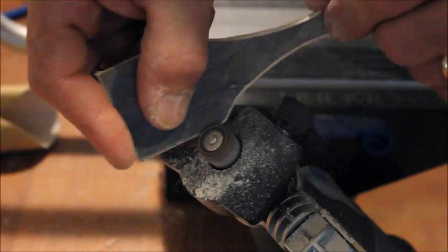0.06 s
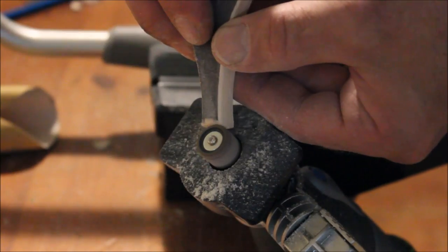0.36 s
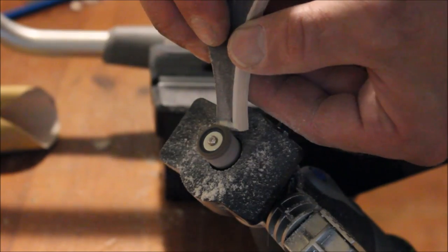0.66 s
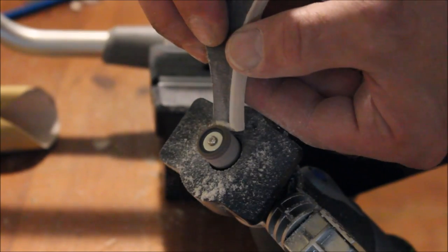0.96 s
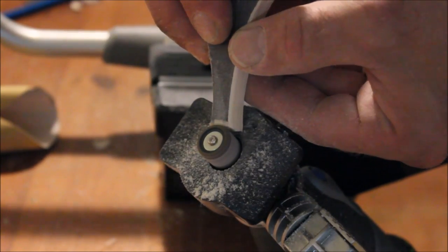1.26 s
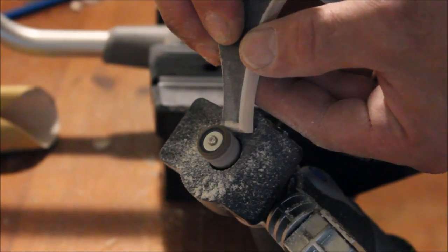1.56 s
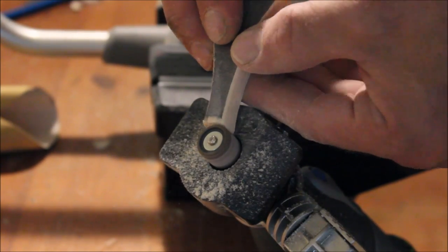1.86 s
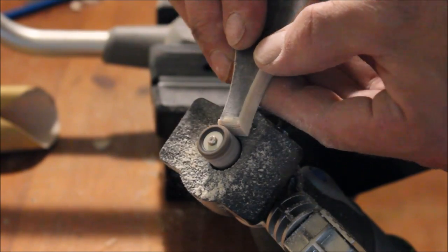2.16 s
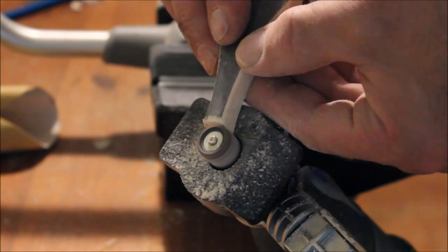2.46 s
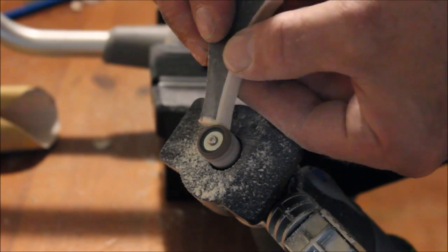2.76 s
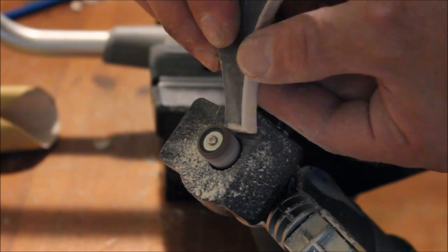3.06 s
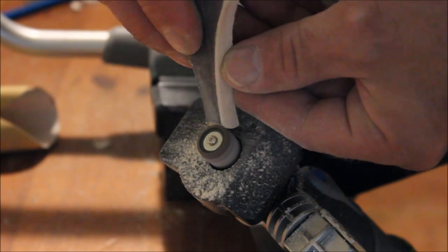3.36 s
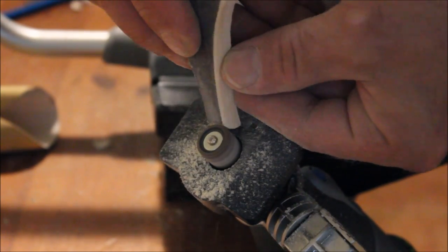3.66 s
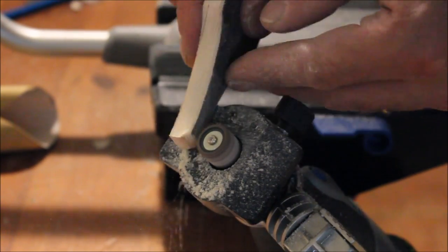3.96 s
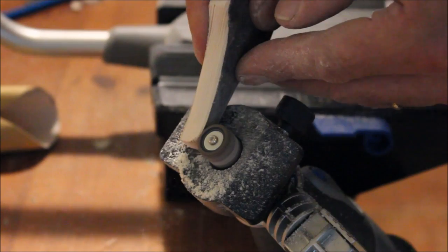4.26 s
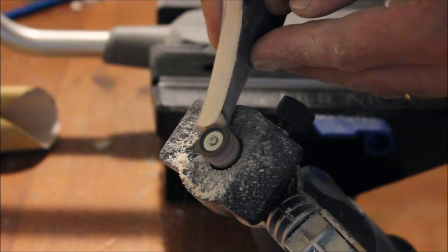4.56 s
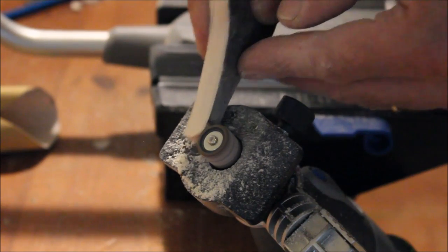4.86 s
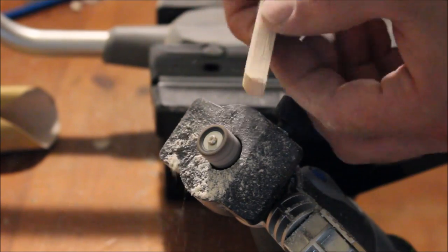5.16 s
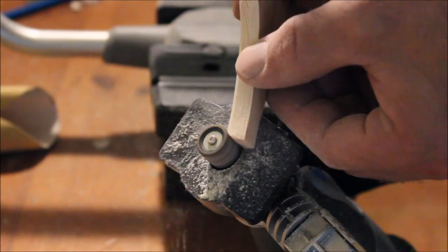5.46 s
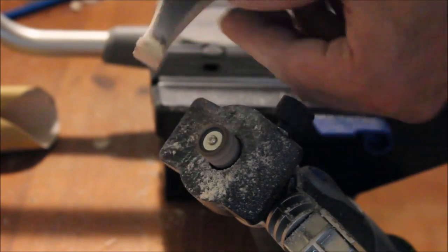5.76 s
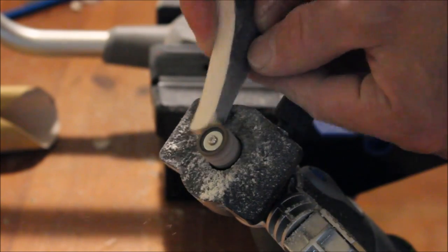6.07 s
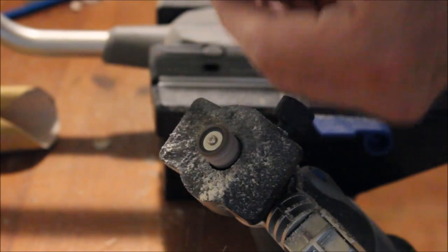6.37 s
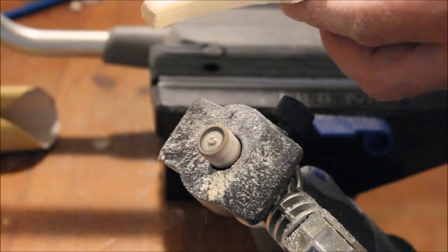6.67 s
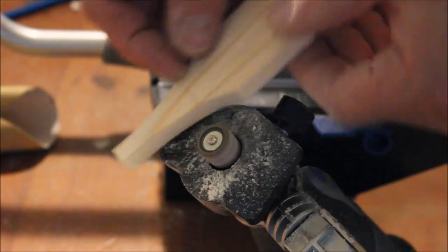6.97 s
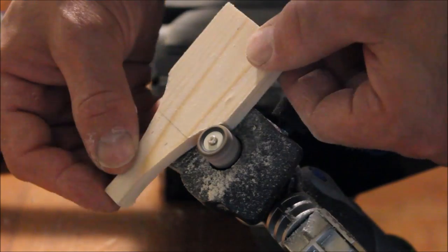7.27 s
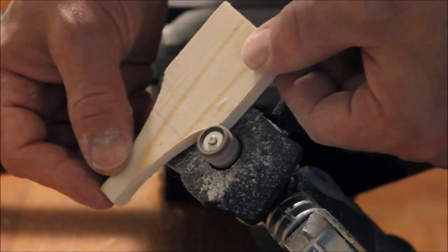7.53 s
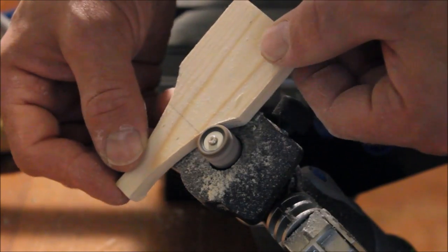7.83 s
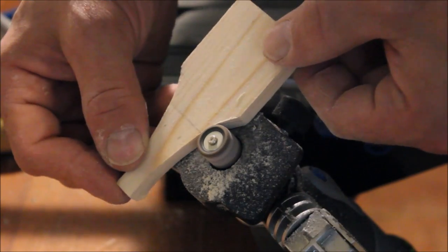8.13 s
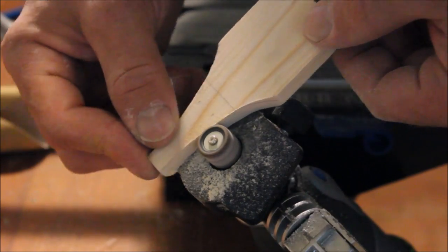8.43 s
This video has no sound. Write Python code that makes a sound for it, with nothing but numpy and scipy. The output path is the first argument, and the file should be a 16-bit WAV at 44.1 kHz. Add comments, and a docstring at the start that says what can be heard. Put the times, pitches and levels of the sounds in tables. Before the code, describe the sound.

Wood grinds against a small spinning sanding drum with a gritty buzz, broken by gaps where the motor whines back up.

```python
"""Workbench, close up: a small rotary tool whines as wood meets its sanding drum in five passes and a graze.
Each hand stroke drags the speed to about half; between passes the motor runs up again. The grit repeats
every turn and buzzes through the resonances of wood and tool; torn fibres hiss; the wood chatters and
bites. Shaft harmonics and fan air make the whine, over a faint workshop rumble and hum.
At moments the noise drops out and a few clean tones remain."""
import sys
import numpy as np
from scipy import signal
from scipy.fft import rfft, irfft, next_fast_len
from scipy.io import wavfile
from scipy.ndimage import uniform_filter1d, map_coordinates

SR = 44100
rng = np.random.default_rng(int(sys.argv[2]) if len(sys.argv) > 2 else 0)


def digitize_waveform(pressure):
    """Quantize a signal to 16-bit integers and store it at the path in sys.argv[1].

    Rows of a 2-D input are taken as channels; values are limited to [-1, 1].
    """
    field = np.atleast_2d(pressure).T
    bounded = np.clip(field, -1, 1)
    quanta = np.round(bounded * 32767).astype(np.int16)
    wavfile.write(sys.argv[1], SR, quanta)


N = 374839
TIME_S = np.arange(N) / SR
FREQ_HZ = np.maximum(np.arange(N // 2 + 1) * SR / N, 1)
IDLE_HZ = 573.6

# Levels are relative. Drag: share of idle speed lost.
# Buzz, rasp and hiss bands: low/Hz, high/Hz
BANDS = [(20, 3000), (3000, 7500), (7500, 20000)]
# Wood on drum: start/s, end/s, buzz/dB, rasp/dB, hiss/dB, sizzle above 12 kHz/dB, whine return delay/s
PASSES = [(-.1, 3.752, -50, -56.5, -52, -3.5, 0.0078), (4.065, 5.04, -60, -52.5, -54, 2, 0.022),
          (5.401, 5.752, -52, -55, -57.5, 2, 0.0011), (5.945, 6.18, -64, -50.5, -56.5, 5, 0.022),
          (7.137, 7.16, -60.5, -50, -59, -6, 0), (7.215, 8.6, -61, -48.5, -53.5, -5, 0.0031)]
# Hand presses harder: start/s, length/s, first drag, last drag, buzz/dB, rasp/dB, hiss/dB
STROKES = [(-0.001, 0.14, 0.48, 0.38, -3, 4.5, 3), (0.181, 0.59, 0.52, 0.18, -0.5, 5, -0.5),
           (0.487, 0.44, 0.47, 0.56, -1.5, 0.5, -1), (0.858, 0.15, 0.2, 0.66, -2.5, 4.5, 0),
           (1.039, 0.32, 0.44, 0.23, -0.5, 4.5, -0.5), (1.203, 0.33, 0.45, 0.59, -0.5, 1.5, -2.5),
           (1.557, 0.42, 0.54, 0.41, -0.5, 3.5, -3), (2.042, 0.19, 0.6, 0.38, -1, 5, -4),
           (2.081, 0.35, 0.15, 0.47, 0.5, 4.5, -1), (2.497, 0.22, 0.57, 0.36, 1, 6.5, -0.5),
           (2.739, 0.24, 0.6, 0.36, 1, 5.5, 1), (2.917, 0.11, 0.29, 0.59, -3, 0.5, -1.5),
           (3.074, 0.26, 0.45, 0.17, 3, 3.5, 0.5), (3.253, 0.28, 0.55, 0.49, 0.0, 1, -2.5),
           (3.562, 0.15, 0.24, 0.53, 1, 4, -0.5), (4.148, 0.1, 0.7, 0.68, 5, -1.5, -4.5),
           (4.291, 0.22, 0.49, 0.46, 3, -1, -3.5), (4.533, 0.2, 0.29, 0.54, -4.5, -6.5, -5),
           (4.864, 0.21, 0.58, 0.31, -2.5, -5.5, -2.5), (5.448, 0.22, 0.52, 0.51, 1.5, 5, 5.5),
           (5.986, 0.17, 0.63, 0.41, 6, -1, 3.5), (7.222, 0.077, 0.63, 0.81, 10, -0.5, -0.5),
           (7.333, 0.2, 0.54, 0.33, 8, -1.5, -4), (7.582, 0.22, 0.61, 0.48, 7.5, 0.5, -4),
           (7.837, 0.11, 0.51, 0.6, 7.5, -3, -6), (7.982, 0.21, 0.34, 0.54, 8, -3, -5.5),
           (8.235, 0.34, 0.54, 0.5, 4, -2.5, -4)]
# Grit catches (+) or wood slips (-): t/s, half length/s, added drag, buzz/dB, rasp/dB, hiss/dB
CATCHES = [(0.021, 0.062, -0.019, 5, 3, -4), (0.176, 0.03, 0.04, 4, 0, -2),
           (0.345, 0.036, -0.043, -3.5, 0, 3), (0.402, 0.028, -0.044, 1.5, -1.5, 1.5),
           (0.639, 0.036, -0.041, 0.5, -2.5, 0.5), (0.929, 0.026, -0.027, 3, -5, 2.5),
           (0.575, 0.02201, 0.034, -2, -4.5, -5), (0.977, 0.025, 0.049, -3, -7, -0.5),
           (1.223, 0.019, -0.072, 4.5, 3, 2.5), (1.754, 0.033, 0.0057, 0.5, 3, 2.5),
           (1.937, 0.014, -0.13, 1, 1, -4), (1.992, 0.02, 0.029, -1.5, 0.5, 0),
           (2.196, 0.052, -0.054, 1.5, -2.5, 2.5), (2.279, 0.033, -0.16, -1.5, -2.5, 2),
           (2.466, 0.018, 0.074, -4, 3, 0), (2.922, 0.025, 0.23, -1, -1.5, 0.5),
           (2.968, 0.018, -0.18, -1.5, 0, 1.5), (3.098, 0.047, 0.0068, -4, 4, 1),
           (3.499, 0.045, -0.015, -1, 4.5, 3.5), (4.102, 0.06, -0.056, -1, 4.5, -3),
           (4.257, 0.065, 0.018, -6.5, -2.5, -3), (4.389, 0.019, 0, 3, -1, -1.5),
           (4.538, 0.044, -0.053, -4.5, 1, 0.5), (4.565, 0.018, -0.038, 2, 0.5, -6),
           (4.604, 0.014, 0.025, 6, 7.5, 3), (4.714, 0.04, -0.03, 9, 5.5, 1),
           (4.802, 0.034, 0.085, -4.5, -4.5, -5), (4.896, 0.021, 0.0047, -17.5, -0.5, -8.5),
           (4.976, 0.03, 0.011, 3, 9.5, 0), (5.699, 0.049, 0.047, -2.5, -0.5, 5.5),
           (5.99, 0.018, -0.03, -9, -3, -4), (6.113, 0.012, -0.018, -4.5, -8.5, -5),
           (7.236, 0.024, -0.004, -10, 1.5, 1), (7.403, 0.018, 0.0092, -2.5, -2, 0.5),
           (7.528, 0.022, -0.015, 2, 0.5, 2), (7.696, 0.018, -0.13, 1, -0.5, -2),
           (7.605, 0.019, -0.08, 3.5, 3.5, 3.5), (7.755, 0.02, 0.01, -2, -6, -3),
           (7.786, 0.018, -0.12, 0.5, -1.5, 2), (7.845, 0.036, -0.0015, 4, 5.5, 4),
           (7.958, 0.016, -0.022, 0.5, 1, 0), (8.052, 0.014, 0.16, 3, 1.5, 2)]
# Grit digs in: t/s, half length/s, tearing over buzz/dB
TEARS = [(.16, .025, 9), (.52, .025, 12), (.91, .03, 8), (1.78, .035, 10), (2.05, .02, 10), (2.63, .02, 9),
         (2.93, .05, 11), (4.19, .04, 10), (4.87, .015, 10), (4.99, .03, 9), (5.66, .05, 11),
         (6.07, .1, 10), (7.28, .05, 5), (8, .17, 4)]
# Chatter rings one wood resonance: t/s, half length/s, f/Hz, level/dB
CHATTER = [(0.035, .06, 1650, 11), (0.203, 0.066, 2300, 15), (0.443, 0.043, 2520, 19),
           (0.657, 0.087, 1250, 12), (0.818, 0.12, 3100, 9), (.85, 0.045, 4100, 15),
           (0.978, 0.11, 1210, 13.5), (1.175, 0.078, 2806, 7), (1.37, 0.098, 3136, 13),
           (1.434, 0.078, 1283, 17), (1.911, 0.1, 902, 16), (2.1, 0.069, 4040, 5.5),
           (2.141, 0.1, 852.5, 14.5), (2.626, 0.058, 863.6, 5), (3.22, 0.062, 2378, 18.5),
           (3.679, 0.069, 2274, 7.5), (4.201, 0.17, 5630, 9.5), (4.4, 0.051, 6440, 20),
           (4.47, 0.086, 3710, 12), (5.569, 0.062, 4868, 23), (5.613, 0.029, 2086, 8),
           (5.649, 0.058, 4565, 13.5), (7.368, 0.04, 3950, 4.5), (7.471, 0.038, 1750, 18),
           (7.635, 0.066, 4173, 10), (7.838, 0.025, 3520, 14), (8.401, 0.097, 1645, 13),
           (8.419, .11, 4220, 12)]
# All noise drops out briefly, a few clean tones remain: t/s, half length/s, noise drop/dB
CLEAN_TONE_GAPS = [(.392, .018, 30), (.575, .027, 32), (4.065, .016, 10), (4.381, .018, 32),
                   (4.895, .02, 17), (7.155, .022, 22), (7.55, .012, 7), (7.635, .01, 7), (7.84, .018, 7),
                   (8.22, .018, 24)]
# Clean tone targets, each rounded to a shaft order: f/Hz
CLEAN_TONE_HZ = [1200, 1750, 2000, 2350, 3400, 3750, 5700, 6450, 8500, 11200]
# Broad sanding spectrum: f/Hz, level/dB
SANDING_SPECTRUM = [(120, -77), (200, -57.5), (293, -48.5), (715, -23.5), (923, -20), (1210, -21),
                    (1330, -10.5), (2420, -0.5), (2960, -8), (4030, -5), (5700, -12), (10800, -10.5),
                    (15500, -12.5)]
# Resonances and hollows of wood and tool: f/Hz, width/Hz, lift/dB
BODY_RESONANCES = [(291, 26, 12.5), (444, 32, 7), (524, 37, -26.5), (699, 76, -14), (942, 37, 8),
                   (1210.5, 180, 18), (1308, 36, -8), (1526, 70, 3.5), (1755, 51, 8.5), (1837, 96, -5.5),
                   (2020, 360, 4.5), (2396, 70, 7), (2680, 29, -3), (3095, 110, -5), (3164, 130, 6),
                   (3315, 91, -9), (3494, 110, 7.5), (3904, 200, -0.5), (4120, 63, 13), (5330, 120, 5.5),
                   (6430, 1300, 3.5), (7480, 210, 3.5), (10640, 640, 5), (11980, 1300, -6)]
# Duller, broad piece of wood: f/Hz, width/Hz, lift/dB
BROAD_PIECE = [(3720, 760, 2.5), (5760, 840, -3)]
# Whine at idle: shaft order, level/dB
WHINE_ORDERS = [(1, -2.5), (2, -12), (2.5, -12), (3, -8), (4, -10), (5, -10), (5.5, -11), (6, -6), (7, -12),
                (8, -10), (9, 0), (10, -9), (11, -6), (12, -8), (13, -10), (16, -12), (17, -7), (18, -10),
                (19, -16)]
# Strongest overtone swells to a whistle: shaft order, t/s, half length/s, lift/dB
WHISTLE = (9, 7.06, .1, 4)
# Fan air and brush noise: f/Hz, level/dB
AIR_SPECTRUM = [(120, -78), (200, -39), (506, -24), (564, -20), (690, -21), (1170, -17), (1540, -11.5),
                (1680, -16.5), (1880, -9), (2330, -9.5), (5300, -6.5), (8500, -14.5), (10400, -5.5),
                (12200, -18), (15500, -16.5)]
# Workshop rumble: f/Hz, level/dB
ROOM_SPECTRUM = [(20, 17.5), (35, -13), (60, -1.5), (120, -22), (190, -2.5), (260, -17), (400, -10.5),
                 (1000, -33)]
# Wood bites and sounds a tone: t/s, half length/s, shaft order, level/dB
BITES = [(4.127, .017, 7, -47), (4.95, .05, 13, -53), (5.965, .022, 7, -54), (7.148, .021, 7, -53),
         (7.229, .02, 7, -50), (7.294, .017, 12, -47), (8.44, .09, 15, -52)]


def undb(db):
    """dB to gain."""
    return 10 ** (np.asarray(db) / 20)


def unit(x):
    """Scale to rms 1."""
    return x / np.sqrt(np.mean(x ** 2))


def steady(x, window_s):
    """Hold short-term rms at 1."""
    return x / np.sqrt(uniform_filter1d(x ** 2, int(window_s * SR)) + 1e-12)


def walk(rate_hz):
    """Smooth random drift, rms 1."""
    steps = np.repeat(rng.standard_normal(N // 64 + 1), 64)[:N]
    size = max(int(SR / rate_hz), 1)
    return unit(uniform_filter1d(uniform_filter1d(steps, size), size))


def span(t_s, half_s):
    """Flat-topped swell centred on t_s."""
    return np.interp(TIME_S, t_s + half_s * np.array([-1.3, -.6, .6, 1.3]), [0, 1, 1, 0])


def hold(start_s, end_s, attack_s=.012, release_s=.012):
    """1 from start to end, ramps outside."""
    return np.clip(np.minimum((TIME_S - start_s) / attack_s, (end_s - TIME_S) / release_s) + 1, 0, 1)


def spectrum_db(points):
    """Interpolate a spectrum over log frequency."""
    hz, db = np.transpose(points)
    return np.interp(np.log(FREQ_HZ), np.log(hz), db)


def resonance_db(hz, resonances=BODY_RESONANCES):
    """Summed resonance lift at hz."""
    return sum(db / (1 + (2 * (hz - centre) / width) ** 2) for centre, width, db in resonances)


def colour(x, gain):
    """Filter by a gain given on FREQ_HZ."""
    size = next_fast_len(N, True)
    bins_hz = np.arange(size // 2 + 1) * SR / size
    return irfft(rfft(x, size) * np.interp(bins_hz, FREQ_HZ, gain), size)[:N]


def shelf(x, corner_hz, lift_db):
    """Time-varying treble lift."""
    return x + colour(x, 1 / (1 + (corner_hz / FREQ_HZ) ** 20)) * (undb(lift_db) - 1)


def hand(rest_drag=.17):
    """Strokes, catches and passes set drag, band levels and sizzle."""
    drag, bands_db, sizzle_db = np.full(N, rest_drag), np.zeros((3, N)), np.zeros(N)
    for start_s, length_s, first, last, *db in STROKES:
        press = hold(start_s, start_s + length_s, attack_s=.03, release_s=.04)
        drag += press * (np.interp(TIME_S, [start_s, start_s + length_s], [first, last]) - rest_drag)
        bands_db += np.outer(db, press)
    for t_s, half_s, jerk, *db in CATCHES:
        swell = span(t_s, half_s)
        drag += jerk * swell
        bands_db += np.outer(db, swell)
    for start_s, end_s, *db, pass_sizzle_db, _ in PASSES:
        on = hold(start_s, end_s) > 0
        bands_db[:, on] += np.array(db)[:, None]
        sizzle_db[on] = pass_sizzle_db
    return drag, bands_db, sizzle_db


def spindle(drag, contact, tearing_db, inertia_s=.084, initial_drag=.56):
    """Shaft speed/Hz: lags the drag by rotor inertia, trembles under load, wobbles with the hand."""
    pole = np.exp(-1 / (inertia_s * SR))
    load = contact * np.clip(drag, 0, .9)
    lagged, _ = signal.lfilter([1 - pole], [1, -pole], load, zi=[initial_drag * pole])
    tremble = (.0003 + .005 * contact * undb(tearing_db / 2)) * walk(130)
    wobble = .006 * contact * walk(25)
    return IDLE_HZ * (1 - lagged) * (1 + tremble + wobble)


def grit(turns, speed_hz, noise_drop_db, renew_hz=104.78, worn_share=.034, patchy_db=3.5, orders=52):
    """Grit force: a rough profile read once a turn, changing as the contact wanders along the drum."""
    worn = np.exp(2j * np.pi * rng.random(orders))
    drift = rng.standard_normal((1536, orders, 3))
    for k in range(orders):  # coarse bumps outlast fine ones
        drift[:, k] = unit(uniform_filter1d(drift[:, k], 4 + 40 // (k + 6), axis=0))
    fresh = (drift[..., 0] + 1j * drift[..., 1]) * undb(patchy_db * drift[..., 2])
    harmonics = np.sqrt(worn_share) * worn + np.sqrt(1 - worn_share) * fresh / np.std(fresh)
    profiles = irfft(np.pad(harmonics, ((0, 0), (1, 0))), 512)
    position = [TIME_S * renew_hz, turns % 1 * 512]
    rough = unit(map_coordinates(profiles, position, order=1, mode="grid-wrap"))
    rough_gain = undb(-noise_drop_db)
    tones = sum(clean_tones(t_s, half_s, np.interp(t_s, TIME_S, speed_hz))
                for t_s, half_s, _ in CLEAN_TONE_GAPS)
    force = rough_gain * rough + np.sqrt(np.maximum(1 - rough_gain ** 2, 0)) * tones
    return force + chatter(force) / np.sqrt(orders)


def sanding(turns, speed_hz, band_gains, tearing_db, noise_drop_db, sizzle_db,
            fibres_db=(-17, -11.5, -3), grab_db=(2.5, 3, 4), broad_from_s=7):
    """Grit buzz and tearing fibres ring wood and tool; higher bands hold more tearing."""
    body = undb(spectrum_db(SANDING_SPECTRUM) + resonance_db(FREQ_HZ))
    radiation = .4 + .6 / (1 + (720 / FREQ_HZ) ** 12)  # small pieces radiate little bass
    buzz = colour(grit(turns, speed_hz, noise_drop_db), radiation)
    throb_db = 2.5 * np.cos(2 * np.pi * turns)  # drum runs out of true
    snap_db = 2 * walk(900)  # fibres snap unevenly
    fibres = rng.standard_normal(N) * undb(throb_db + snap_db)
    broad = undb(resonance_db(FREQ_HZ, BROAD_PIECE))
    buzz, fibres = (np.where(TIME_S < broad_from_s, x, colour(x, broad)) for x in (buzz, fibres))
    grabs = walk(63) - 3 * np.maximum(walk(45) - 1, 0)  # fibres briefly let go
    rumble = unit(colour(fibres, body / (1 + (FREQ_HZ / 400) ** 12)))
    out = undb(-45) * band_gains[0] * rumble
    for band, (low_hz, high_hz) in enumerate(BANDS):
        passband = body * (FREQ_HZ >= low_hz) * (FREQ_HZ < high_hz)
        tear_gain = undb(fibres_db[band] + tearing_db - noise_drop_db + grab_db[band] * grabs)
        mix = steady(colour(buzz, passband), .023) + tear_gain * unit(colour(fibres, passband))
        judder = undb(1.29 * walk(200) + .86 * walk(76))
        out += mix / np.sqrt(1 + tear_gain ** 2) * band_gains[band] * judder
    return shelf(out, 12000, sizzle_db + 2 * walk(25))  # finest scraping comes in spurts


def bench(x, echo_db=-6, decay_s=.03):
    """Short reflections from vice, hands and bench ripple the treble."""
    t_s = np.arange(1024) / SR
    echoes = rng.standard_normal(len(t_s)) * np.exp(-t_s / decay_s) * (t_s > .001)
    wet = signal.fftconvolve(x, echoes / np.linalg.norm(echoes))[:N]
    return x + undb(echo_db) * colour(wet, 1 / (1 + (2500 / FREQ_HZ) ** 2))


def motor(turns, speed_hz, air_gain, whine_gain, half_order_db=-21):
    """Shaft harmonics, shaken by the bearing, over fan air that pulses with the shaft."""
    cages = [np.cos(2 * np.pi * (.103 * turns + k / 3)) for k in range(3)]
    flutters = [undb(2 * walk(48) + 3 * cage) for cage in cages]
    whistle_order, whistle_s, half_s, whistle_db = WHISTLE
    octaves = np.log2(speed_hz / IDLE_HZ)
    orders = {k + .5: half_order_db for k in range(2, 19)} | dict(WHINE_ORDERS)
    whine = 0
    for k, (order, db) in enumerate(sorted(orders.items())):
        shake = flutters[k % 3] if order > 1 else 1  # unbalance tone is steady
        if order == whistle_order:
            shake = shake * undb(whistle_db * span(whistle_s, half_s) + 35 * octaves)
        whine = whine + shake * undb(db - resonance_db(order * IDLE_HZ)) * shaft_tone(turns, order)
    # orders flare as they sweep the resonances; the small housing radiates little bass
    housing = undb(resonance_db(FREQ_HZ)) / np.sqrt(1 + (480 / FREQ_HZ) ** 14)
    whine = shelf(unit(colour(whine, housing)), 7200, 12 * octaves)  # shrill only near full speed
    pulse = undb(2 * np.cos(2 * np.pi * turns) + 3.5 * cages[0])
    air = bench(unit(colour(rng.standard_normal(N) * pulse, undb(spectrum_db(AIR_SPECTRUM)))))
    mix = undb(-56) * whine_gain * whine + undb(-58.5 + .89 * walk(21)) * air_gain * air
    return mix * undb(octaves)  # 1 dB per octave of speed


def shaft_tone(turns, order):
    """Sine locked to the shaft, random phase."""
    return np.sin(2 * np.pi * (order * turns + rng.random()))


def workshop(contact, rumble_db=-93, handling_db=4, hum_hz=401.5, hum_db=-92.5):
    """Hum and faint rumble, stronger while the wood shakes the bench."""
    rumble = unit(colour(rng.standard_normal(N), undb(spectrum_db(ROOM_SPECTRUM))))
    rumble *= undb(rumble_db + handling_db * contact + 2.6 * walk(22))
    return rumble + undb(hum_db) * np.sqrt(2) * np.sin(2 * np.pi * hum_hz * TIME_S)


def chatter(force, width_hz=330):
    """The force rings single wood resonances in quick bursts."""
    bursts = unit(undb(3 * walk(55)))
    out = np.zeros(N)
    for t_s, half_s, ring_hz, db in CHATTER:
        ring = signal.lfilter(*signal.iirpeak(ring_hz, ring_hz / width_hz, fs=SR), force)
        out += span(t_s, half_s) * undb(db) * steady(ring, .024)
    return bursts * out


def clean_tones(t_s, half_s, speed_hz):
    """A few shaft orders of random strength hold their pitch through one gap in the noise."""
    swell, tones = span(t_s, half_s), np.zeros(N)
    on = swell > 0
    tones_hz = np.round(np.array(CLEAN_TONE_HZ) / speed_hz) * speed_hz
    cycles = np.outer(tones_hz, TIME_S[on]) + rng.random((len(tones_hz), 1))
    gains = undb(2.1 * rng.standard_normal(len(tones_hz)))
    tones[on] = unit(gains @ np.sin(2 * np.pi * cycles))
    return swell * tones


def bites(turns, neighbour_db=-8, flutter_db=2):
    """Stick-slip locks to the drum: one order and the next follow its speed."""
    out = np.zeros(N)
    for t_s, half_s, order, db in BITES:
        pair = shaft_tone(turns, order) + undb(neighbour_db) * shaft_tone(turns, order + 1)
        out += span(t_s, half_s) * undb(db) * pair
    return out * undb(flutter_db * walk(150))


def scene(motor_duck_db=-8, whine_duck_db=-3, band_db_per_octave=(1.2, -2.2, 2.5)):
    """The shaft drives sanding, motor and bites; under load the motor's own sound recedes."""
    contact = sum(hold(start_s, end_s) for start_s, end_s, *_ in PASSES)
    loaded = np.max([hold(start_s, end_s + delay_s) for start_s, end_s, *_, delay_s in PASSES], axis=0)
    tearing_db = sum(db * span(t_s, half_s) for t_s, half_s, db in TEARS)
    noise_drop_db = sum(db * span(t_s, half_s) for t_s, half_s, db in CLEAN_TONE_GAPS)
    drag, bands_db, sizzle_db = hand()
    speed_hz = spindle(drag, contact, tearing_db)
    turns = np.cumsum(speed_hz) / SR
    band_gains = contact * undb(bands_db + np.outer(band_db_per_octave, np.log2(speed_hz / 300)))
    dip = undb(-noise_drop_db)  # air and room drop out too
    tool = undb(motor_duck_db * loaded) * motor(turns, speed_hz, dip, undb(whine_duck_db * loaded))
    room = dip * workshop(contact)
    wood = bench(undb(.56) * sanding(turns, speed_hz, band_gains, tearing_db, noise_drop_db, sizzle_db))
    mono = wood + tool + room + bites(turns)
    return np.array([mono, mono])


def record(dry, cutoff_hz=15750):
    """Steep low-pass."""
    return signal.sosfilt(signal.ellip(12, .1, 80, cutoff_hz, fs=SR, output="sos"), dry)


dry = scene()
out = record(dry)
digitize_waveform(out)
```